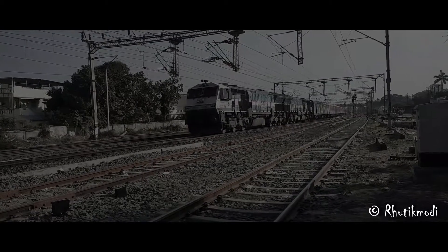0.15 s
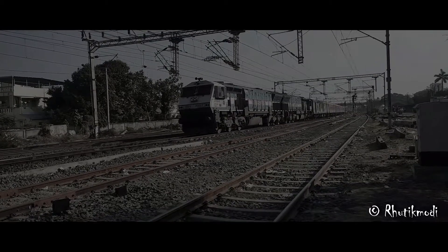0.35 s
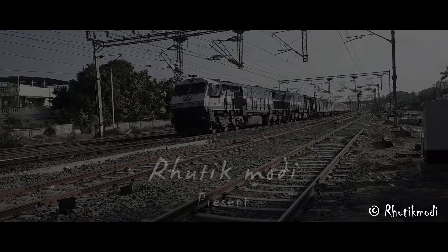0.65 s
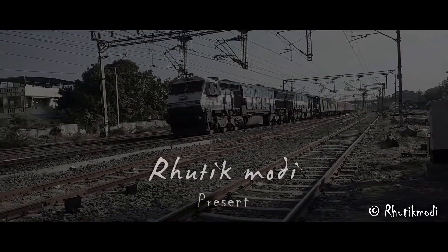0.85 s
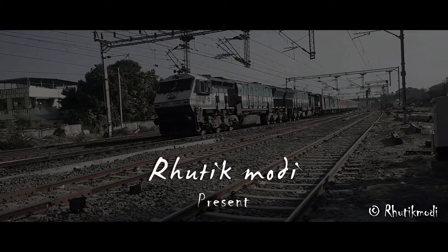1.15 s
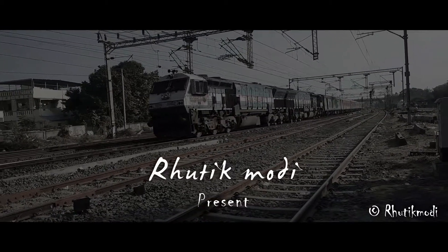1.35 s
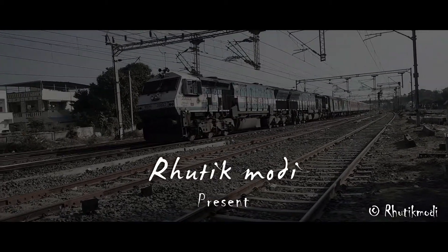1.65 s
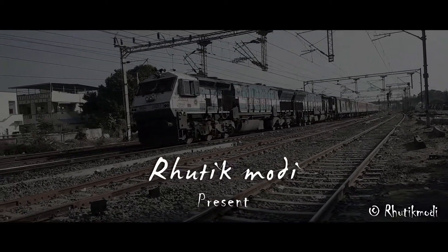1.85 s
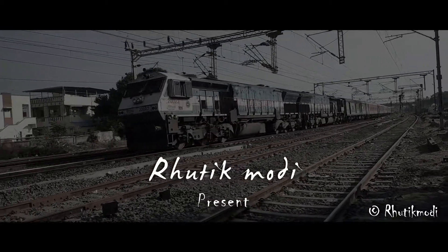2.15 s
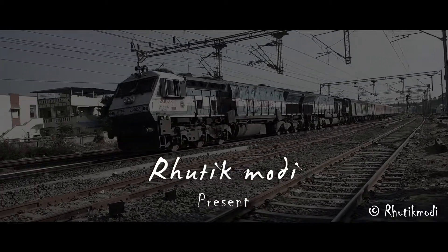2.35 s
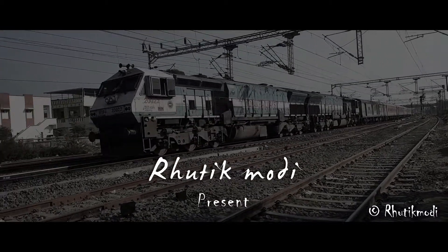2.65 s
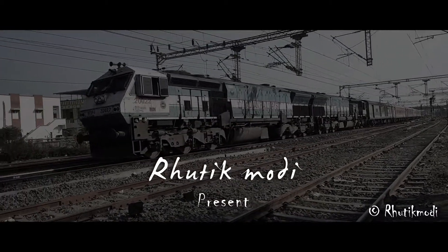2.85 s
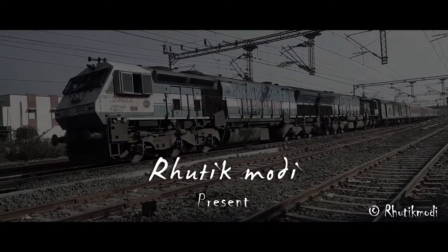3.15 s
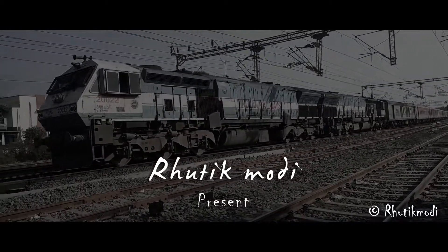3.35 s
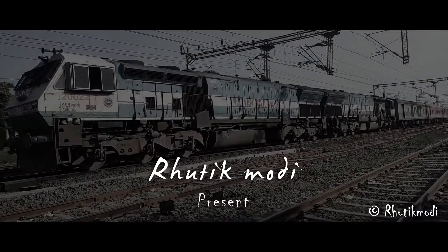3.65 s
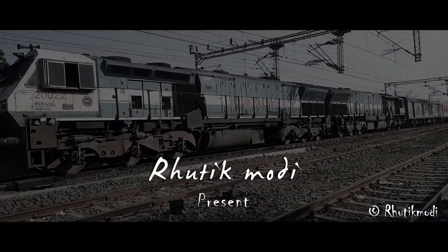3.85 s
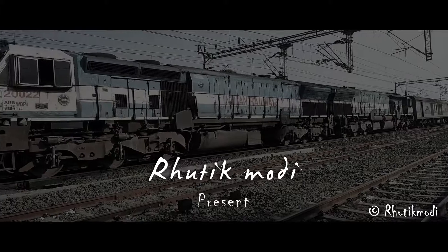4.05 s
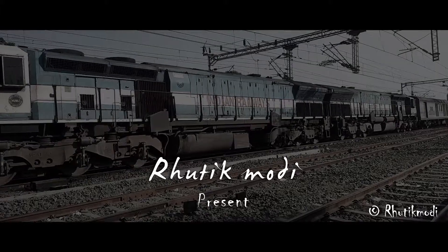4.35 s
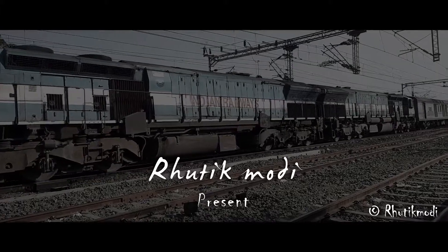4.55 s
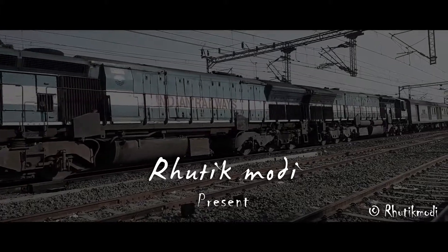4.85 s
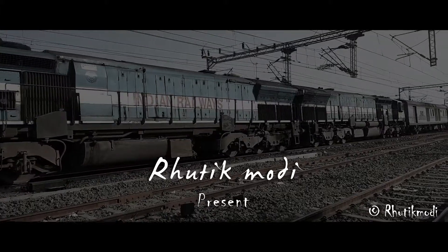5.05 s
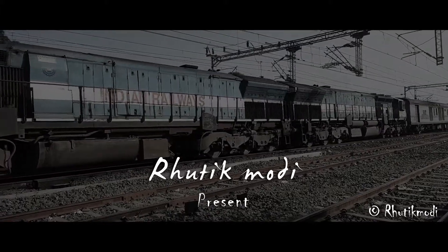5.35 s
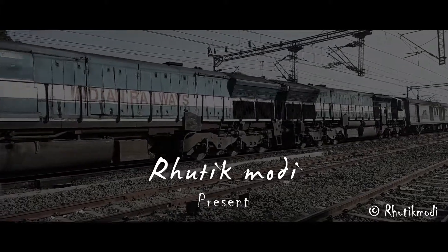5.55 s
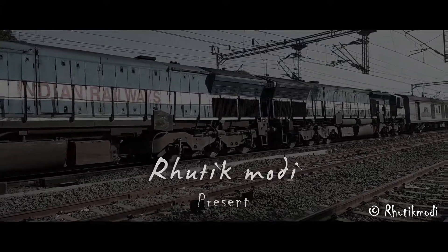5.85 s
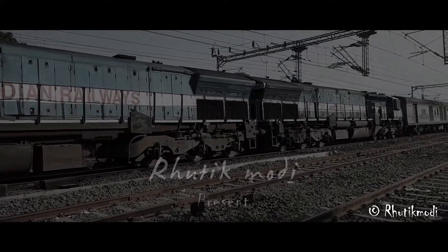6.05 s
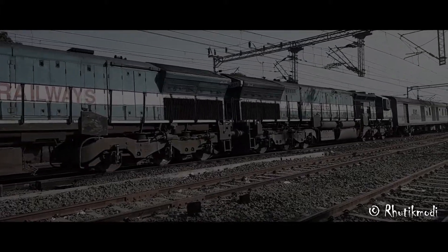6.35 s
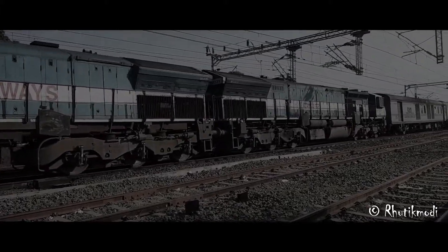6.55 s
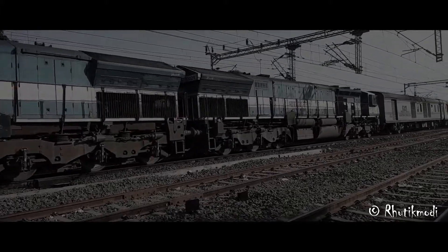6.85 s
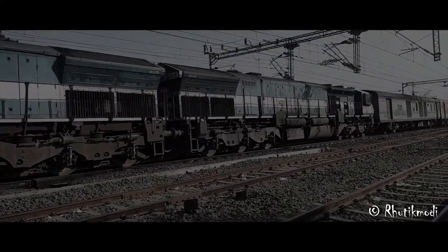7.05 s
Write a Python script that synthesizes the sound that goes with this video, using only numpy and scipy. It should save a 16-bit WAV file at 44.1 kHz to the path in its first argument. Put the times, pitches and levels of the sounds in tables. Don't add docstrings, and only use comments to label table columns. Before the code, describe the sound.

Diesel locomotives approach at trackside: low pulsing rumble, rough ringing knock and wide hiss-like roar, with thin gear, fan and turbine tones on top. The whine peaks between five and six seconds, shifting around the stereo image, as pitch droops in passing. A nearby single-cylinder motorcycle coughs twice, starts at two seconds, putters, then speeds up. One faint bird note and a tiny dry click; open air, stereo microphones.

```python
import sys
import numpy as np
from scipy import signal
from scipy.io import wavfile
from scipy.ndimage import uniform_filter1d

SR = 44100
rng = np.random.default_rng(int(sys.argv[2]) if len(sys.argv) > 2 else 0)


def digitize_waveform(pressure):
    field = np.atleast_2d(pressure).T
    bounded = np.clip(field, -1, 1)
    quanta = np.round(bounded * 32767).astype(np.int16)
    wavfile.write(sys.argv[1], SR, quanta)


def how_loud(loudness_db):
    steps = np.asarray(loudness_db, float) / 20
    return 10 ** steps


N = 317545
TIME = np.arange(N) / SR


def exhaust():
    trail_hz, trail_start_turns, behind_s = 5.973, .685, 2
    doppler = columns(PASS, TIME - behind_s)[0]
    trailing_turns = trail_start_turns + trail_hz * np.cumsum(doppler) / SR
    return orders(crank_turns(), "order ") + orders(trailing_turns, "trailing ")


# crank order, level in dB against order 15.
UPPER_ORDERS = [(10, -12), (11, -16), (12, -16), (13, -5), (14, -8), (15, 0), (16, -6), (17, -11)]


def orders(turns, engine):
    angle = 2 * np.pi * turns
    low = 0
    for k in range(7, 10):
        stack_shift = .8 * (k - 8) ** 2
        low = low + how_loud(heard_db(engine + str(k))) * np.cos(k * angle + 2.4 + stack_shift)
    upper = sum(how_loud(db) * np.cos(int(k) * angle + k ** 2) for k, db in UPPER_ORDERS)
    return np.sqrt(2) * (low + how_loud(heard_db(engine + "15")) * upper)


# time in seconds, Doppler factor on every engine pitch,
# lag of the left microphone in samples.
PASS = [
    (0, 1, -4),
    (3.5, .9985, -1.2),
    (4.5, .9965, 2.5),
    (5.5, .992, 7.6),
    (6.5, .986, 15.8),
    (7.2, .983, 19),
    (8, .981, 22),
]


def crank_turns():
    crank_hz, start_turns = 6.115, .475
    return start_turns + crank_hz * np.cumsum(columns(PASS)[0]) / SR


# frequency in Hz, width in Hz, level in dB.
BLOCK_MODES = [(690.2, 20.7, 22), (729, 77, 12.5), (666, 26, -24), (763, 69, 8.5), (1350, 120, -21),
               (930, 69, -24)]


def knock(pattern):
    rough = .74
    turns = crank_turns()
    count = 16 * turns
    at = np.flatnonzero(np.diff(np.floor(count)))
    cylinder = np.floor(count[at + 1]).astype(int) % 16
    blows = np.zeros(N)
    blows[at] = pattern[cylinder] * how_loud(1.0 * rng.standard_normal(len(at)))
    rattle = rng.standard_normal((2, N)) * (1 + .3 * np.cos(2 * np.pi * turns))
    drive = (1 - rough) * evened(blows) + rough * rattle
    hood = signal.butter(2, 1800, fs=SR, output="sos")
    drive = signal.sosfilt(hood, drive)
    ring = sum(how_loud(db) * evened(resonate(drive, hz, width)) for hz, width, db in BLOCK_MODES)
    return how_loud(heard_db("knock") - 3.5) * evened(ring)


def resonate(x, hz, width):
    turn = np.exp(2j * np.pi * hz * np.cumsum(columns(PASS)[0]) / SR)
    r = np.exp(-np.pi * width / SR)
    return 2 * (turn * signal.lfilter([1 - r], [1, -r], x / turn)).real


# frequency in Hz, density in dB per Hz.
ROAR_FAR = [(30, -11), (60, -19), (95, -16), (150, -13), (380, -24), (690, -16), (1060, -27), (1400, -20),
            (2700, -32), (4100, -42), (5600, -43), (7200, -55), (9800, -73), (14000, -78)]
ROAR_NEAR = [(30, -13), (65, -17), (160, -16), (500, -27), (690, -21), (1060, -31), (1400, -27),
             (2100, -29), (2700, -36), (4200, -45), (5600, -43), (7900, -47), (9800, -61), (14000, -73)]


def roar():
    hz, t, z = signal.stft(rng.standard_normal((2, N)), SR, nperseg=2048, noverlap=1536)
    patches = uniform_filter1d(rng.standard_normal(z.shape[1:]), 20, 0)
    patches = evened(uniform_filter1d(patches, 8, 1))
    fizz_db = np.interp(t, [0, 4.3], [10, 1])
    treble = np.clip(hz[:, None] / 2000 - 2.5, 0, 1)
    colour = how_loud(blend(ROAR_FAR, ROAR_NEAR, hz, t) + treble * fizz_db)
    colour /= np.sqrt(np.sum(colour[42:121] ** 2, axis=0) / len(hz))
    level = how_loud(heard_db("roar", t) + 1.0 + 0.69 * patches)
    gas = signal.istft(z * colour * level, SR, nperseg=2048, noverlap=1536)[1][:, :N]
    return gas * (1 + 0.011 * np.cos(2 * np.pi * crank_turns()))


def turbine():
    line = whistle(5403, 40, .6)
    skirt = np.array([whistle(5310, 150, 0), whistle(5310, 150, 0)])
    octave = np.array([whistle(10790, 200, 0), whistle(10790, 200, 0)])
    return how_loud(heard_db("turbine")) * (line + how_loud(-3.5) * skirt) + how_loud(heard_db("octave")) * octave


# frequency in Hz, width in Hz.
GEAR_TONES = [
    (966, 14),
    (1349, 20),
    (1930, 14),
    (2899, 26),
]


def gears():
    tones = []
    for k, (hz, width) in enumerate(GEAR_TONES):
        tones.append(how_loud(heard_db("gear " + str(k + 1))) * whistle(hz, width, .5))
    return tones


def blowers():
    blower = whistle(2963, 30, .3) + how_loud(-10) * whistle(3035, 25, .1) + how_loud(-11) * whistle(5920, 130, 0)
    fan = whistle(3466, 20, .6)
    return how_loud(heard_db("fan")) * fan, how_loud(heard_db("blower")) * blower


def whistle(hz, width, steady):
    sag = .0022 * np.cos(2 * np.pi * crank_turns())
    speed = columns(PASS)[0] * (1 - sag)
    turn = np.exp(2j * np.pi * hz * np.cumsum(speed) / SR)
    r = np.exp(-np.pi * width / SR)
    a, b = rng.standard_normal((2, N))
    fuzz = signal.lfilter([1], np.convolve([1, -r], [1, -r]), a + 1j * b)
    fuzz = fuzz / np.sqrt(np.mean(abs(fuzz) ** 2))
    steady = np.clip(steady, 0, 1)
    return (turn * (np.sqrt(2 * steady) + np.sqrt(2 - 2 * steady) * fuzz)).real


PARTS = {"order 7": (-28, 8.3, 1.2), "order 8": (-15, 6.54, 0.99), "order 9": (-26, 5.3, 1.5),
         "order 15": (-27, 8.4, 4.34), "trailing 7": (-42, 6.2, 5), "trailing 8": (-36, 4, 2.6),
         "trailing 9": (-36.5, 5.7, 4.3), "trailing 15": (-32.5, 5, 0.97), "roar": (-32.5, 6.4, 3.19),
         "knock": (-27, 5.74, 2.53), "gear 1": (-46.5, 7.4, 6.8), "gear 2": (-41.5, 3.5, 12),
         "gear 3": (-47.5, 5.7, 1.46), "gear 4": (-47.5, 4.4, 5), "blower": (-41, 5.93, 1.3),
         "fan": (-48.5, 4.65, 1.4), "turbine": (-40, 5.57, 1), "octave": (-64, 6.5, 0.79)}
# part, time in seconds,
# half length in seconds, change in dB.
COVER = [("roar", 4.66, 0.43, 1.4), ("order 9", 3.5, .2, -6), ("order 15", 5.6, 0.12, 3.6),
         ("roar", 6.64, 0.39, -1), ("knock", 0.85, .4, 1.4), ("knock", 2.9, 0.63, -3),
         ("knock", 4.4, 0.32, 0.73), ("knock", 4.2, .4, -3), ("knock", 5.5, 0.67, 1.1),
         ("gear 1", 2.2, .35, -15), ("gear 1", 3.25, .3, -14), ("gear 1", 6, 0.29, -20),
         ("gear 2", 0.5, 0.52, -9.5), ("gear 2", 2.95, 0.14, -7), ("gear 2", 4.26, 0.46, -3),
         ("gear 2", 7.0, 0.22, -1), ("gear 3", 4.45, 0.16, 4.2), ("gear 3", 4.9, 0.15, 3.9),
         ("gear 4", 0.35, 0.61, -8), ("gear 4", 3.25, 1, -7), ("blower", 2.7, 0.34, -4),
         ("blower", 6.52, 0.031, 9.2), ("fan", 5.63, 0.12, 4.5), ("fan", 6.5, 0.4, -6),
         ("turbine", 1.5, 0.45, 4.6), ("fan", 1.35, .5, -3.5), ("turbine", 2.63, 0.4, 4.4),
         ("turbine", 5.4, 0.19, 3.6), ("turbine", 3.51, 0.17, -5.5), ("turbine", 4.5, .15, 4)]


def heard_db(part, t=TIME):
    closest_db, closest_s, reach_s = PARTS[part]
    cover_db = sum(db * np.exp(-((t - s) / half) ** 4) for name, s, half, db in COVER if name == part)
    return closest_db - 10 * np.log10(1 + ((t - closest_s) / reach_s) ** 2) + cover_db


# time in seconds, firings per second.
BIKE_RATE = [(2.033, 11.23), (2.21, 13.77), (3.14, 14.35), (3.59, 13.84), (4.26, 14.85), (4.44, 16.3),
             (4.55, 13.99), (4.69, 13.55), (5.12, 13.48), (5.22, 15.16), (5.51, 15.35), (5.96, 17.01),
             (6.51, 19.34), (6.82, 19.86), (7.08, 21.94)]
# time in seconds, thump level in dB.
BIKE_DB = [(1.9, -14), (2.1, -18), (2.7, -15), (3.2, -13.5), (3.6, -20.5), (4.0, -21), (4.25, -24.5),
           (4.6, -14.5), (4.9, -14.5), (5.3, -18), (5.7, -15), (6.1, -8.5), (6.5, -11.5), (6.8, -19.5),
           (7.1, -29)]
# time in seconds, level in dB.
KICKS = [
    (0.303, -21),
    (0.44, -17.5),
]
# frequency in Hz, level in dB, 60 dB decay time in seconds.
PIPE = [(84, -1, .12), (125, -7, .11), (160, -7, .13), (230, -15, .11), (285, -14, .11)]


def motorcycle():
    running = TIME > BIKE_RATE[0][0]
    cycles = np.cumsum(columns(BIKE_RATE)[0] * running) / SR
    at = np.flatnonzero(np.diff(np.ceil(cycles)))
    firings = np.zeros(N)
    firings[at] = how_loud(columns(BIKE_DB)[0][at] + 1.8 * rng.standard_normal(len(at)))
    for s, db in KICKS:
        firings[int(s * SR)] = how_loud(db)
    t = np.arange(8000) / SR
    thump = sum(how_loud(db - 60 * t / t60) * -np.sin(2 * np.pi * hz * t) for hz, db, t60 in PIPE)
    silencer = signal.butter(3, [44, 400], "bandpass", fs=SR, output="sos")
    thump = signal.sosfilt(silencer, thump)
    return signal.oaconvolve(firings, thump)[60:N + 60]


def chirp():
    hz = np.interp(TIME, [.91, .96, 1.0, 1.04], [7560, 7640, 7650, 7600])
    rough = evened(uniform_filter1d(rng.standard_normal(N), 150))
    swell = np.exp(-((TIME - .975) / 0.06) ** 4)
    return how_loud(-59) * rough * swell * np.sin(2 * np.pi * np.cumsum(hz) / SR)


def tick():
    out = np.zeros(N)
    out[int(4.3603 * SR)] = how_loud(-32.5)
    return np.diff(out, prepend=0)


# frequency in Hz, share of direct sound.
SAME = [(50, 0.25), (120, 0.98), (300, 0.57), (700, 0.9), (1500, 0.35), (3000, 0.18), (5400, 0.22),
        (8000, 0.12)]
# frequency in Hz, left minus right in dB.
LEAN_FAR = [(60, 0.0), (96, 0.0), (150, 2.0), (240, 1.0), (390, 0.0), (620, -1.0), (990, -2.5),
            (1580, -6.5), (2510, -5.5), (4010, -1.5), (6390, 3.0), (10200, -6.0)]
LEAN_NEAR = [(60, 0.0), (96, 0.5), (150, 0.5), (240, 1.0), (390, 2.5), (620, -2.0), (990, -0.5),
             (1580, -5.0), (2510, -5.5), (4010, -1.5), (6390, -2.5), (10200, -9.0)]


def pair(x, lag_share, ahead_s):
    hz, t, z = signal.stft(np.atleast_2d(x), SR, nperseg=1024, noverlap=768)
    same = np.clip(spectrum(SAME, hz), .05, 1) ** (len(z) - 1)
    lag_s = lag_share * columns(PASS, t + ahead_s)[1] / SR
    late = np.exp(-2j * np.pi * hz[:, None] * lag_s)
    lean = how_loud(blend(LEAN_FAR, LEAN_NEAR, hz, t) / 2)
    left = (same * z[0] + np.sqrt(1 - same ** 2) * z[-1]) * late * lean
    right = z[0] / lean
    return signal.istft(np.array([left, right]), SR, nperseg=1024, noverlap=768)[1][:, :N]


def evened(x):
    return x / np.sqrt(np.mean(x ** 2) + 1e-20)


def columns(rows, t=TIME):
    s, *values = np.transpose(rows)
    return [np.interp(t, s, v) for v in values]


def spectrum(rows, hz):
    knots, values = np.transpose(rows)
    return np.interp(np.log(hz + 1), np.log(knots + 1), values)[:, None]


def blend(far, near, hz, t):
    a, b = spectrum(far, hz), spectrum(near, hz)
    return a + (b - a) * np.clip((t - 1.2) / 4.9, 0, 1)


# time in seconds, left minus right in dB.
TURBINE_PAN = [
    (0, 3.5),
    (2.4, 6),
    (4.1, 4.5),
    (4.7, -8),
    (5.3, 4.5),
    (6, -3.5),
    (7.2, 2),
]


def scene():
    pattern = how_loud(4.3 * rng.standard_normal(16)) * rng.choice([-1, 1], 16)
    pan = how_loud(np.outer([.5, -.5], columns(TURBINE_PAN)[0]))
    *nose_gears, tail_gear = gears()
    fan, blower = blowers()
    nose, tail = how_loud(np.outer([-5.5, -1.5], [.5, -.5])[..., None])
    tones = nose * pair(sum(nose_gears) + fan, 0.98, .5)
    tones += tail * pair(tail_gear + blower, 0.94, -.45)
    tones += pan * pair(turbine(), 1, 0)
    train = pair(roar(), 0.83, .2) + pair(knock(pattern), 0.41, .2) + tones
    return train + exhaust() + how_loud([[.4], [-.4]]) * motorcycle() + chirp()


# frequency in Hz, limit in dB against the surroundings.
MASKING = [(2000, -26), (3500, -14), (5000, -12), (7000, -10), (8500, -6), (10000, -4), (11500, 0),
           (13200, 1), (14500, 18)]


def drop_masked(x):
    hz, t, z = signal.stft(x, SR, nperseg=2048, noverlap=1536)
    power = abs(z[:, :1024, :z.shape[2] // 2 * 2]) ** 2
    blocks = power.reshape(2, 256, 4, -1, 2).mean((0, 2, 4)) + 1e-20
    around = uniform_filter1d(uniform_filter1d(blocks, size=41, axis=0), size=9, axis=1)
    wander = uniform_filter1d(rng.standard_normal(blocks.shape), 3, 0)
    wander = evened(uniform_filter1d(wander, 3, 1))
    limit_db = spectrum(MASKING, hz[2:1024:4]) + 3 * wander
    kept = blocks > around * how_loud(2 * limit_db)
    z[:, :1024, :power.shape[2]] *= kept.repeat(4, 0).repeat(2, 1)
    return signal.istft(z, SR, nperseg=2048, noverlap=1536)[1][:, :N]


def roll_off(x):
    return signal.sosfilt(signal.butter(12, 16000, fs=SR, output="sos"), x)


def record(dry):
    bass_cut = signal.butter(2, 32, "highpass", fs=SR, output="sos")
    faded_in = dry * np.minimum(TIME / .01, 1)
    heard = signal.sosfilt(bass_cut, faded_in)
    return roll_off(drop_masked(heard) + tick())


dry = scene()
out = record(dry)
digitize_waveform(out)
```